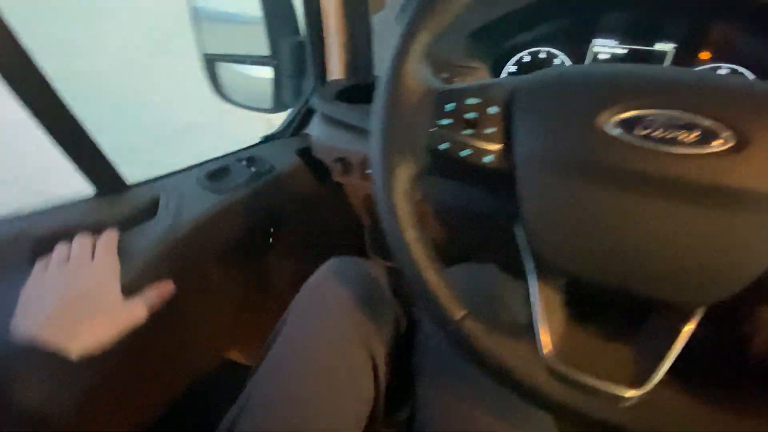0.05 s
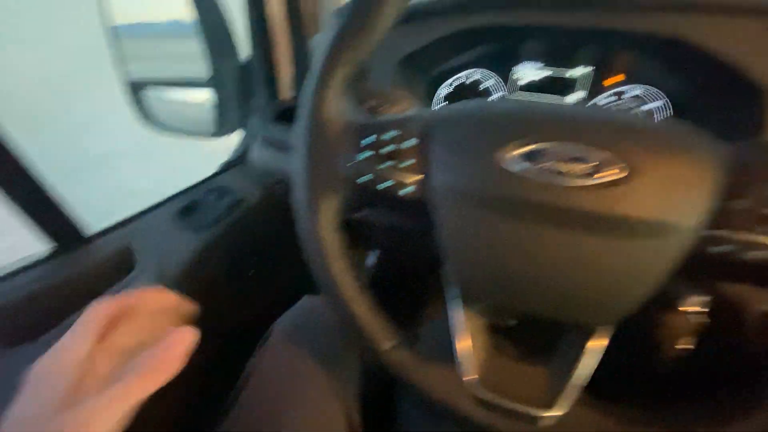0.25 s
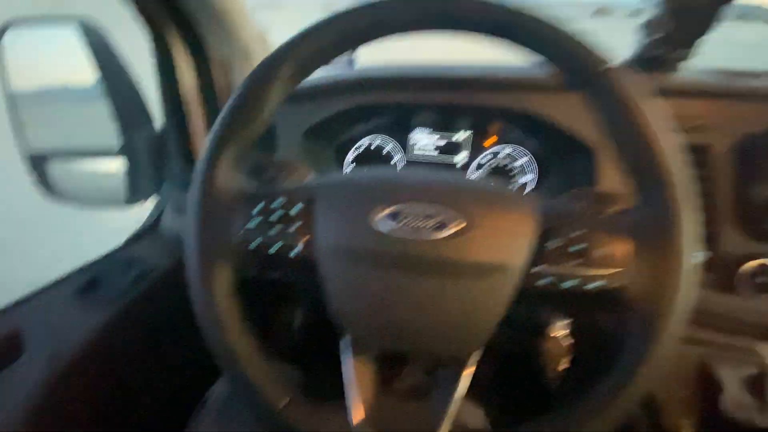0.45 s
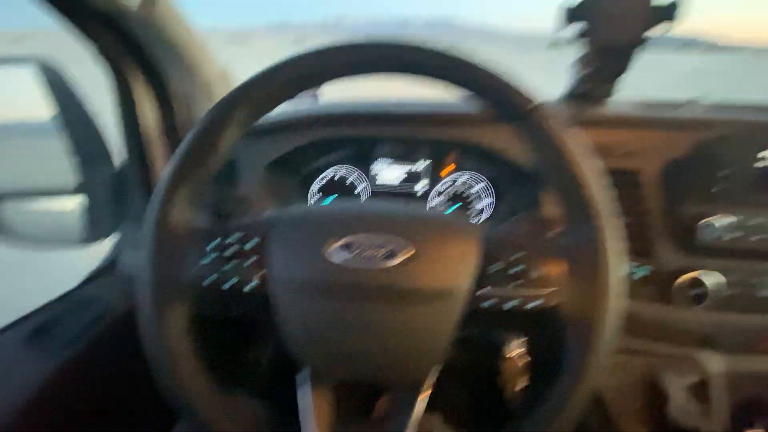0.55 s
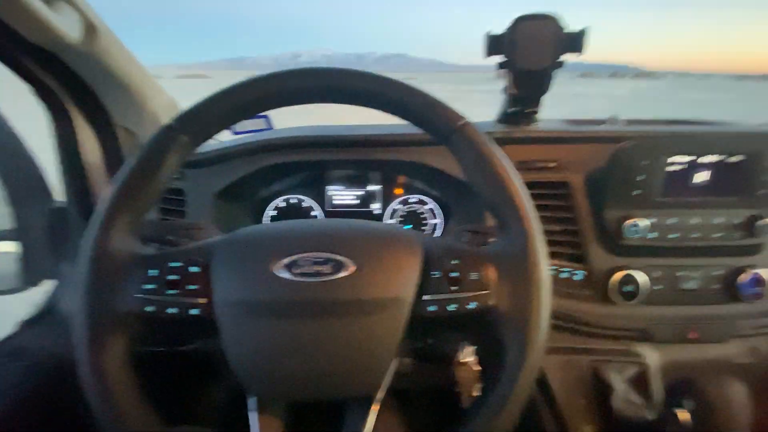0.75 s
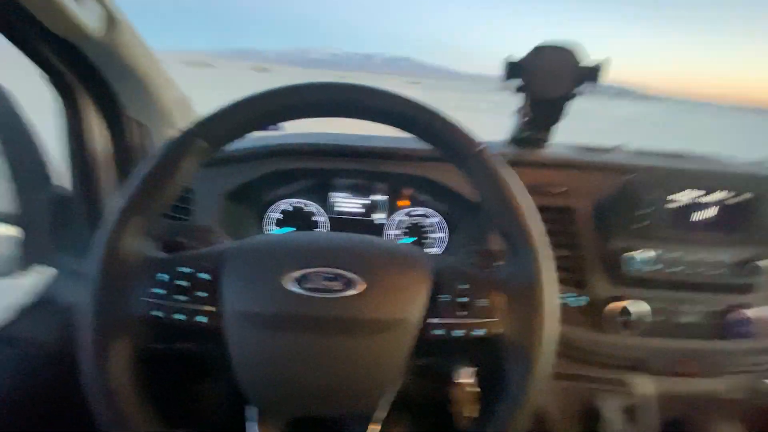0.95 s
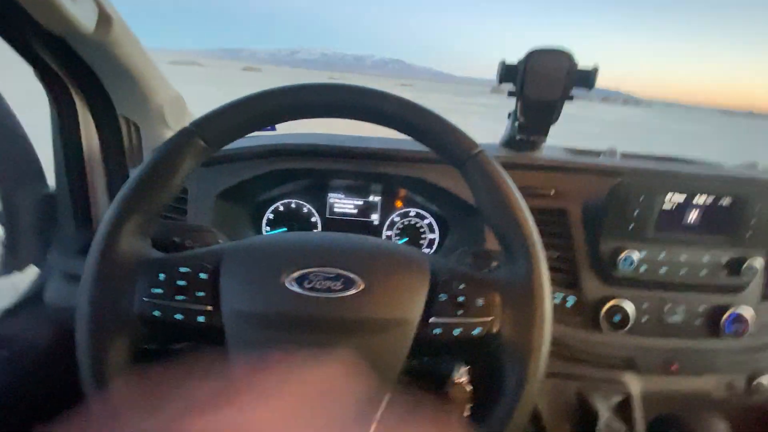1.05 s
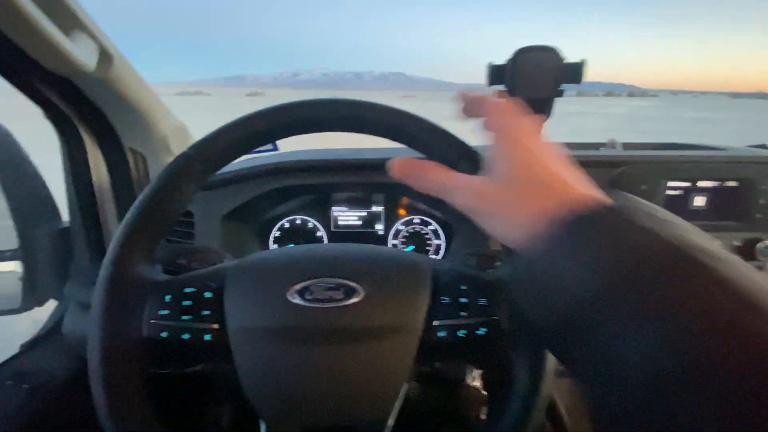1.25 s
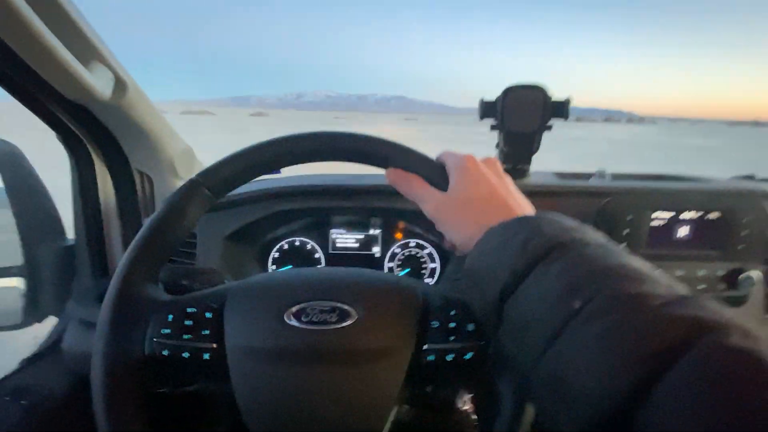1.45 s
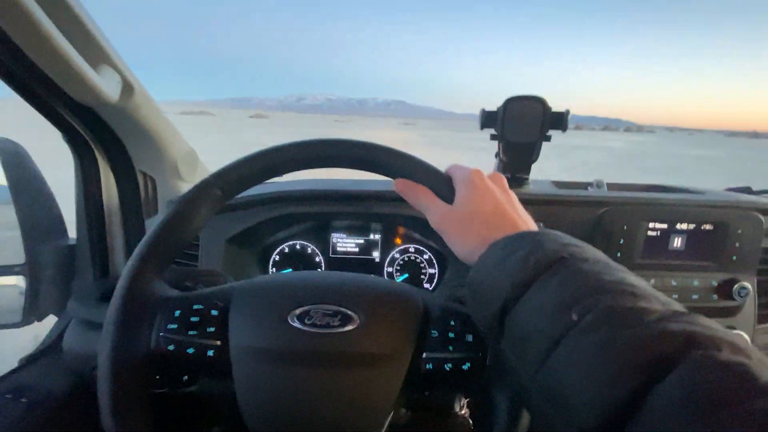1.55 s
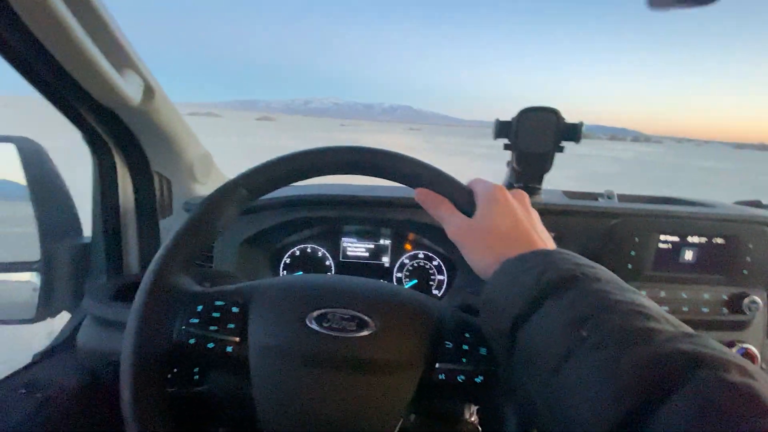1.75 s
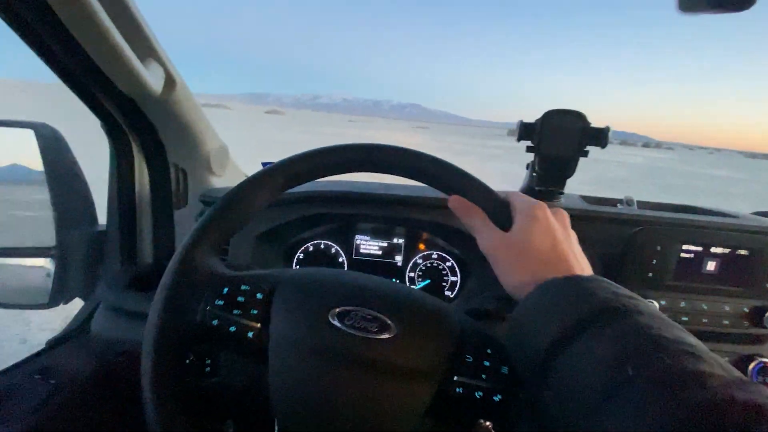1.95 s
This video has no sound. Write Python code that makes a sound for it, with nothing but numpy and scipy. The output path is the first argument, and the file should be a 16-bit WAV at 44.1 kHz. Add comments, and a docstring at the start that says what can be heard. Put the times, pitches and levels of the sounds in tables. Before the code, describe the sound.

Van door pulled shut with a booming slam, followed by light clicks and clothing rustle.

```python
"""Inside a van, a door is pulled shut and slams. The impact excites the low modes of the cabin air,
which boom; panels, trim and door skin rattle in forced vibration, and small metal parts ring freely.
The driver settles: the seat thumps, plastic clicks and knocks, a hand taps and a jacket rustles
over the quiet noise of the cabin. At the slam the pressure overloads the microphone."""
import sys
import numpy as np
from scipy import signal
from scipy.fft import rfft, irfft
from scipy.io import wavfile
from scipy.ndimage import uniform_filter1d

SR = 44100
rng = np.random.default_rng(int(sys.argv[2]) if len(sys.argv) > 2 else 0)


def wrap_up_sound(samples):
    """Save the sound to the file named by the first command line argument, as 16-bit audio."""
    columns = np.atleast_2d(samples).T
    # keep every value between -1 and 1, then stretch to whole-number steps
    tamed = np.clip(columns, -1, 1)
    steps = np.round(tamed * 32767).astype(np.int16)
    wavfile.write(sys.argv[1], SR, steps)


N = 88200

# Background envelopes. Each row: time in seconds, then sway, rumble, cabin noise and cloth levels in dB.
BACKGROUND_LEVELS = [(0, -38.5, -42, -56, -59), (.17, -28.5, -58, -44.5, -59), (.3, -56, -22, -66, -72),
                     (.5, -50, -46, -55, -78), (.58, -38, -40.5, -64.5, -68.5), (.75, -34, -42.5, -54, -66),
                     (.9, -35, -76, -46, -73.5), (1.02, -28, -40.5, -66, -64), (1.1, -35, -55, -60, -69.5),
                     (1.17, -33, -62, -62, -65), (1.3, -28, -64, -59.5, -66), (1.42, -25, -46, -65, -69),
                     (1.47, -29, -62, -64.5, -71.5), (1.68, -35.5, -59, -64.5, -75),
                     (1.85, -42, -48, -63, -78.5), (2, -41, -46.5, -60.5, -80)]
# Noise spectra of body sway, cabin, cloth and trim. Each row: frequency in Hz, relative density in dB.
SWAY_SPECTRUM = [(3, 0), (7, 0), (16, -4), (25, -16)]
CABIN_SPECTRUM = [(32, -25), (55, -4.5), (150, -7.5), (172, -8), (261, -9), (403, -16.5), (787, -20.5),
                  (1080, -23.5), (3000, -37), (3900, -63), (6600, -120)]
CLOTH_SPECTRUM = [(710, -27), (1200, -3), (1830, -0.5), (4140, -5.5), (6930, -5), (12800, -14),
                  (15700, -17)]
TRIM_SPECTRUM = [(710, -37), (1200, -2.5), (2520, -5), (3160, -7.5), (3920, -12), (4710, -12.5),
                 (8780, -17), (15700, -35)]
# Cloth brushing past. Each row: start in seconds, length in seconds, level in dB.
CLOTH_STROKES = [(.678, 0.025, -59), (0.718, 0.019, -54.5), (0.742, 0.02, -62), (1.328, 0.083, -62)]
# Soft taps of a hand. Each row: start in seconds, level in dB.
HAND_TAPS = [(.004, -41), (.073, -42.5), (1.127, -51), (1.246, -47.5)]
# Impacts in the cabin. Each row: start in seconds, hollow knock level in dB, plastic click level in dB.
IMPACTS = [(.167, -41, -65), (.213, -20.5, -54), (.222, -25.5, -38), (0.244, -25, -54), (.269, -19, -29.5),
           (.303, -21, -37), (.349, -28.5, -32.5), (.404, -30.5, -43), (.446, -28, -49.5), (.476, -34, -48),
           (.503, -25, -45.5), (.766, -46, -85), (0.792, -41.5, -41), (.82, -39, -61), (.844, -78, -36.5),
           (.864, -48, -58), (.873, -36.5, -54), (.889, -33.5, -47.5), (.958, -56, -85), (1.437, -69, -69)]
# Resonances of the struck parts. Each row: frequency in Hz, bandwidth in Hz, relative level in dB.
PADDED_MODES = [(312, 240, 3), (520, 220, 3.5), (694, 120, -1.5), (1060, 300, -4.5)]
HOLLOW_MODES = [(300, 100, -15.5), (524, 77, -5.5), (686.5, 38, -0.5), (805, 84, -4), (1122, 78, -7),
                (1500, 250, -8.5)]
PLASTIC_MODES = [(2340, 270, 4.5), (3335, 230, 6), (4170, 140, 3), (5250, 750, -3), (5750, 210, -3.5),
                 (6860, 460, -3), (10100, 5000, -21)]
PANEL_MODES = [(147.5, 60, -3.5), (250, 30, 0.5), (348.4, 72, -4), (562, 176, -2), (612.3, 70, 3),
               (639, 210, -5), (798, 70, -10.5), (1093, 220, -7.5), (1340, 590, -14.5)]
DOOR_SKIN_MODES = [(70.3, 27, 4), (114.7, 19, 2.5), (167.4, 39, -3.5)]
# Small metal parts. Each row: start in seconds, frequency in Hz, level in dB, T60 and rise in seconds.
METAL_MODES = [(.356, 9076, -44, .13, .006), (.369, 9120, -39, .05, .002), (.357, 15330, -57, .18, .003),
               (.4, 11600, -68, .3, .003), (.485, 6675, -45, .15, .002), (.485, 6675, -58, .45, .01),
               (.484, 2719, -46, .35, .008), (.484, 2719, -57, 1.5, .008), (.49, 7354, -47, .55, .012)]
# Low modes of cabin air and seat. Each row: start in seconds, frequency in Hz, level in dB,
# T60 in seconds, polarity (+1 push, -1 pull).
BOOM_MODES = [(.2145, 18.9, -9.5, .9, 1), (.2235, 38, -12, .7, 1), (.234, 48, -12, .12, -1),
              (.79, 55, -33, .3, 1), (.83, 50, -32, .2, 1), (.7, 15, -26, .5, 1), (.797, 98, -27, .12, 1),
              (.833, 88, -24, .15, 1), (.9, 18.5, -26, 1., -1), (.974, 17.5, -28, 1.2, 1)]
# Envelopes of the slam. Each row: time in seconds, then panel, trim and door skin levels in dB.
SLAM_LEVELS = [(.17, -63, -58.5, -69), (.2, -49, -53.5, -64), (.206, -22, -45, -45),
               (.218, -20.5, -27.5, -19), (.24, -24, -34.5, -18.5), (.3, -23, -32.5, -29),
               (.34, -23.5, -34, -28), (.38, -33.5, -37.5, -25.5), (.42, -35, -51, -50),
               (.47, -33.5, -48.5, -44), (.52, -38.5, -46.5, -41), (.56, -51, -80, -42.5),
               (.62, -68, -61, -55.5)]

TIME = np.arange(N) / SR


def amplitude(db):
    """Amplitude grows tenfold for every 20 dB."""
    return 10 ** (np.asarray(db) / 20)


def unit_rms(x):
    """Normalisation to a mean square of one."""
    return x / np.sqrt(np.mean(x ** 2))


def envelope(table, column):
    """Gain over time, interpolated linearly in dB."""
    table = np.array(table)
    return amplitude(np.interp(TIME, table[:, 0], table[:, column]))


def shape_spectrum(x, spectrum):
    """Spectral weighting to unit RMS, silent outside the given band."""
    hz, db = np.array(spectrum).T
    bin_hz = np.arange(N // 2 + 1) * SR / N + 1e-3
    gain_db = np.interp(np.log(bin_hz), np.log(hz), db, left=-200, right=-200)
    return unit_rms(irfft(rfft(x) * amplitude(gain_db), N))


def resonate(force, modes):
    """Modal superposition: resonances of alternating sign add, with unit power gain for white noise."""
    def response(x):
        return sum((-1) ** k * amplitude(db) / np.sqrt(width)
                   * signal.lfilter(*signal.iirpeak(hz, hz / width, SR), x)
                   for k, (hz, width, db) in enumerate(modes))
    impulse_response = response(signal.unit_impulse(8192))
    return response(force) / np.sqrt(np.sum(impulse_response ** 2))


def damped_mode(start, hz, db, t60, rise):
    """Free vibration: a struck mode builds up, then decays by 60 dB in t60 seconds."""
    age = np.maximum(TIME - start, 0)
    return amplitude(db - 60 * age / t60) * (1 - np.exp(-age / rise)) * np.sin(2 * np.pi * hz * age)


def impact_force(table, column, t60_s, rise_s):
    """Impulsive excitation: each impact is a blow followed by exponentially decaying noise."""
    rows = np.array(table)
    starts, db = rows[:, 0], rows[:, column]
    age = np.maximum(TIME - starts[:, None], 0)
    decays = (1 - np.exp(-age / rise_s)) * amplitude(db[:, None] - 60 * age / t60_s)
    force = decays.sum(axis=0) * rng.standard_normal(N)
    decay_energy = SR * t60_s / (2 * np.log(1000))
    force[(starts * SR).astype(int)] += 0.6 * amplitude(db) * np.sqrt(decay_energy)  # the blows
    return force


def random_contacts(per_second=2000, scatter_db=2.5, decay_s=0.002):
    """Shot noise: dense, uneven little impacts, each a short puff of noise."""
    hits = (rng.random(N) < per_second / SR) * amplitude(scatter_db * rng.exponential(size=N))
    puffs = signal.lfilter([1], [1, -np.exp(-1 / (decay_s * SR))], hits)
    return unit_rms(puffs * rng.standard_normal(N))


def cabin_background():
    """Filtered noise: body sway below 25 Hz, rumble, broad cabin noise and a faint narrow hum."""
    sway = shape_spectrum(rng.standard_normal(N), SWAY_SPECTRUM)
    rumble = shape_spectrum(rng.standard_normal(N), [(22, -3.5), (35, -12), (60, -10)])
    cabin = shape_spectrum(rng.standard_normal(N), CABIN_SPECTRUM)
    hum = resonate(rng.standard_normal(N), [(776, 14, 0)])
    return (envelope(BACKGROUND_LEVELS, column=1) * sway
            + envelope(BACKGROUND_LEVELS, column=2) * rumble
            + envelope(BACKGROUND_LEVELS, column=3) * cabin
            + amplitude(-77.5) * hum)


def jacket_rustle(flicker_db=0.5, steps_per_second=28):
    """Friction noise: cloth gives a broadband hiss whose level flickers slightly."""
    hold = int(SR / steps_per_second)
    steps = np.repeat(rng.standard_normal(N // hold + 1), hold)
    flicker = amplitude(-flicker_db * unit_rms(uniform_filter1d(steps, hold)[:N]))
    hiss = shape_spectrum(rng.standard_normal(N), CLOTH_SPECTRUM)
    return envelope(BACKGROUND_LEVELS, column=4) * flicker * hiss


def cloth_swishes(edge_s=0.008):
    """Sliding friction: many tiny contacts merge into each short brush of cloth."""
    strokes = sum(amplitude(db) * np.clip(np.minimum(TIME - start, start + length - TIME) / edge_s, 0, 1)
                  for start, length, db in CLOTH_STROKES)
    return strokes * shape_spectrum(random_contacts(), CLOTH_SPECTRUM)


def hand_taps():
    """Heavy damping: a padded surface answers the hand with broad, short-lived resonances."""
    return resonate(impact_force(HAND_TAPS, column=1, t60_s=0.055, rise_s=0.0014), PADDED_MODES)


def knocks_and_clicks():
    """Impact excitation: hollow modes give each knock its body, higher plastic modes its click."""
    knocks = resonate(impact_force(IMPACTS, column=1, t60_s=0.072, rise_s=0.0014), HOLLOW_MODES)
    clicks = resonate(impact_force(IMPACTS, column=2, t60_s=0.058, rise_s=0.0004), PLASTIC_MODES)
    return knocks + clicks


def metal_tinkles():
    """Light damping: small struck metal parts ring at high, inharmonic frequencies."""
    return sum(damped_mode(*mode) for mode in METAL_MODES)


def cabin_booms(rise_s=0.003):
    """Low-frequency resonance: a push or pull sets cabin air and seat into damped oscillation."""
    return sum(polarity * damped_mode(start, hz, db, t60, rise_s)
               for start, hz, db, t60, polarity in BOOM_MODES)


def door_slam():
    """Forced vibration: the slam shakes panels and trim together while the door skin thuds."""
    shaking = (TIME > SLAM_LEVELS[0][0]) & (TIME < SLAM_LEVELS[-1][0])
    contacts = random_contacts()
    panels = envelope(SLAM_LEVELS, column=1) * resonate(contacts, PANEL_MODES)
    trim = envelope(SLAM_LEVELS, column=2) * shape_spectrum(contacts, TRIM_SPECTRUM)
    thud = envelope(SLAM_LEVELS, column=3) * resonate(random_contacts(), DOOR_SKIN_MODES)
    return shaking * (panels + trim + thud)


def scene():
    """Linear superposition: the pressures of all sources add in one channel."""
    impacts = door_slam() + cabin_booms() + metal_tinkles() + knocks_and_clicks() + hand_taps()
    return (impacts + cloth_swishes() + cabin_background() + jacket_rustle())[None]


def record(dry, limit=0.33, leak=0.06, cutoff_hz=15750):
    """Saturation: the microphone passes little beyond its limit; a low-pass then cuts the top treble."""
    clipped = np.clip(dry, -limit, limit)
    low_pass = signal.ellip(10, 0.2, 80, cutoff_hz, fs=SR, output="sos")
    return signal.sosfilt(low_pass, clipped + leak * (dry - clipped))


dry = scene()
out = record(dry)
wrap_up_sound(out)
```